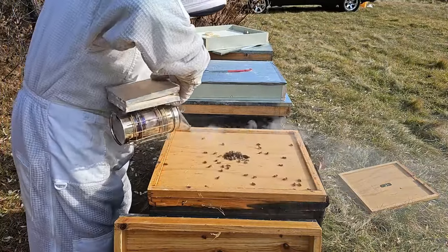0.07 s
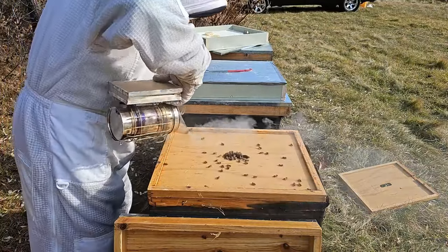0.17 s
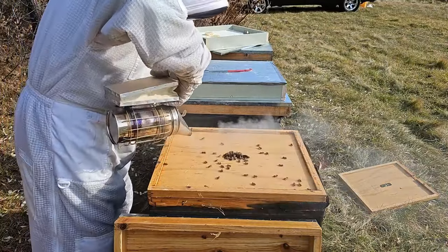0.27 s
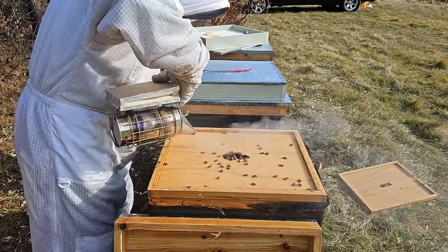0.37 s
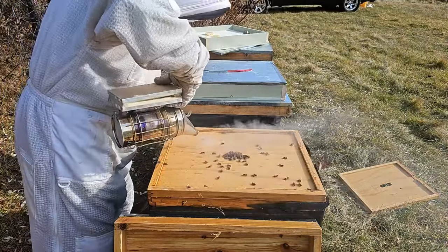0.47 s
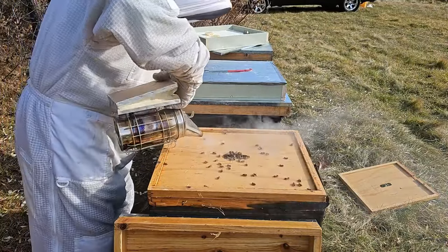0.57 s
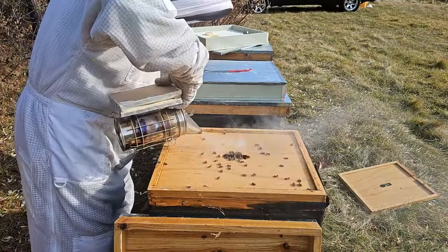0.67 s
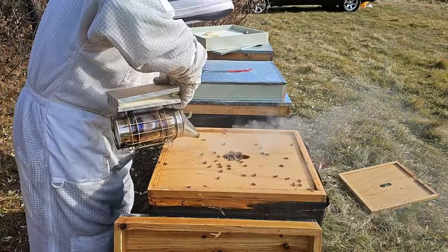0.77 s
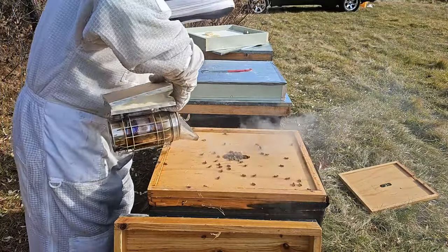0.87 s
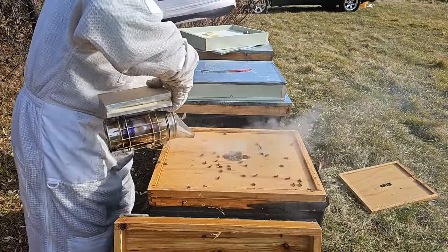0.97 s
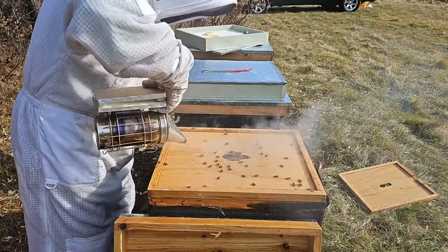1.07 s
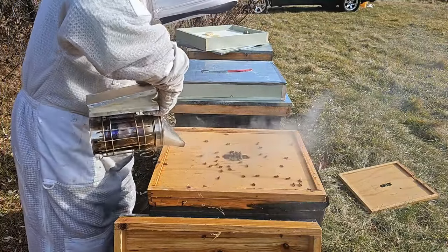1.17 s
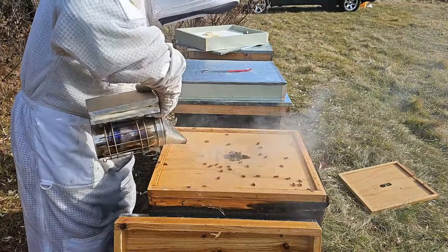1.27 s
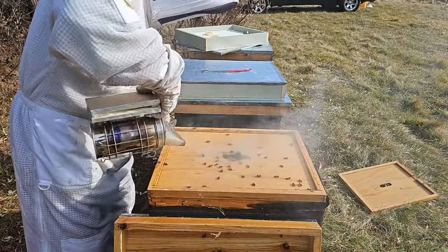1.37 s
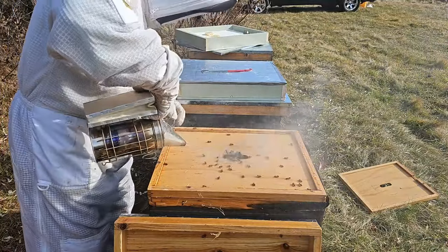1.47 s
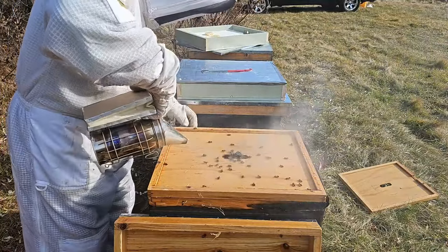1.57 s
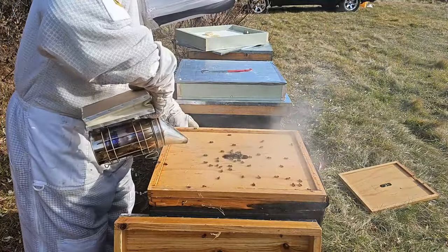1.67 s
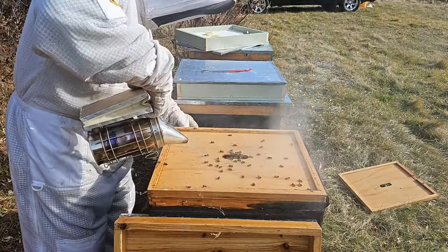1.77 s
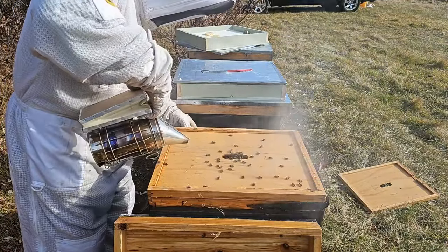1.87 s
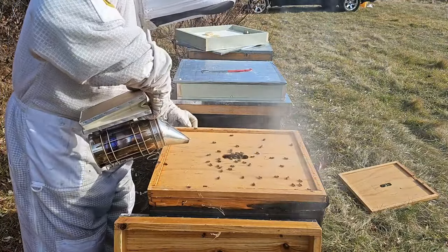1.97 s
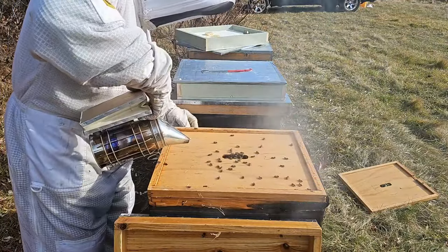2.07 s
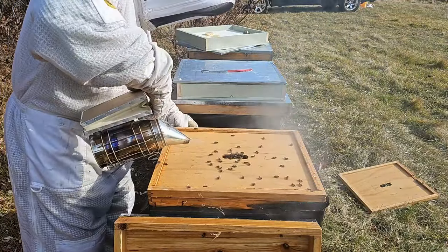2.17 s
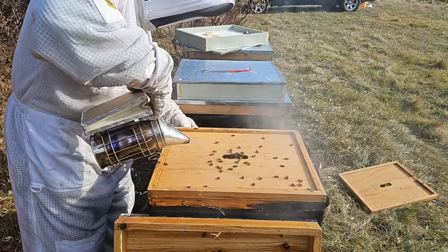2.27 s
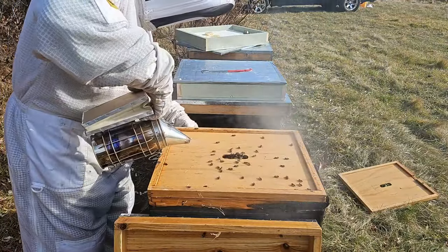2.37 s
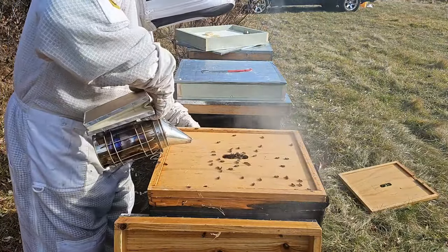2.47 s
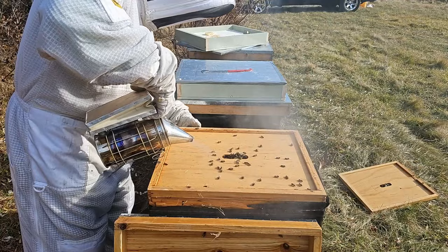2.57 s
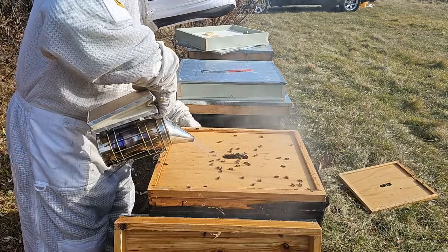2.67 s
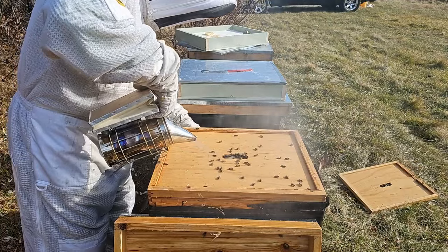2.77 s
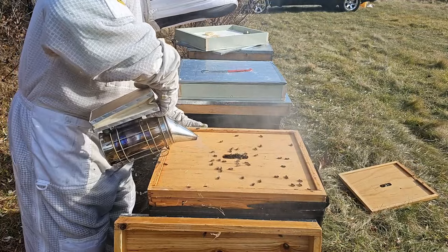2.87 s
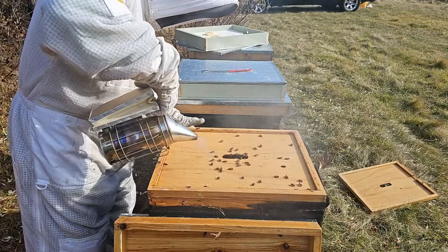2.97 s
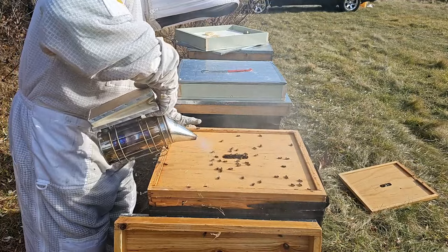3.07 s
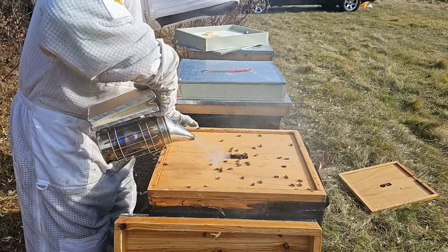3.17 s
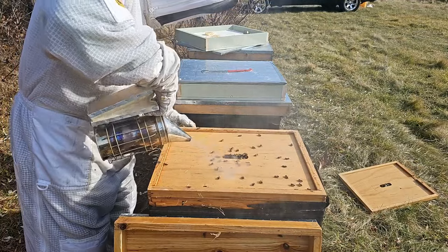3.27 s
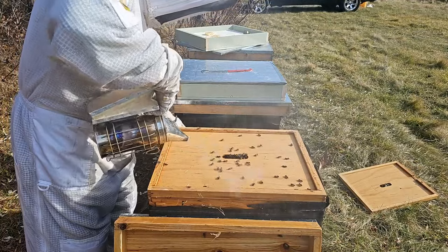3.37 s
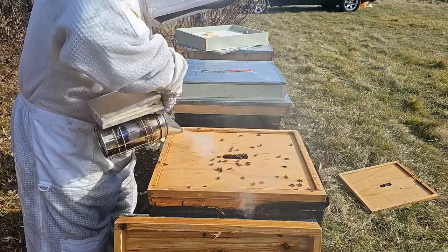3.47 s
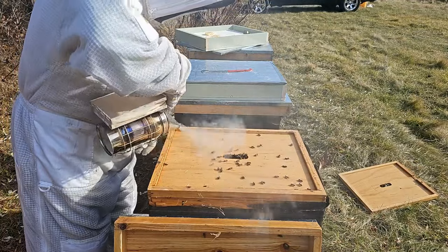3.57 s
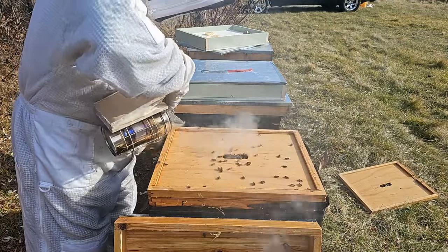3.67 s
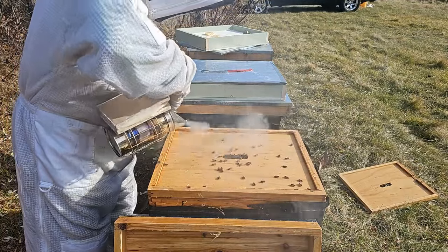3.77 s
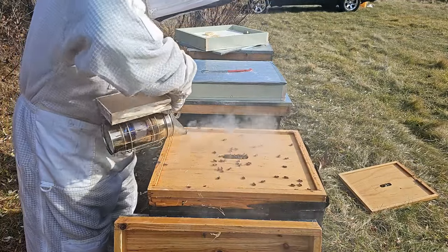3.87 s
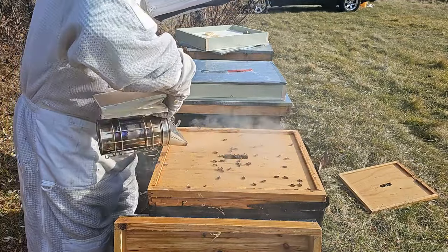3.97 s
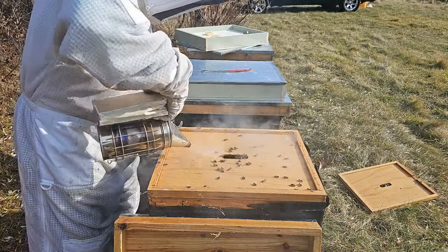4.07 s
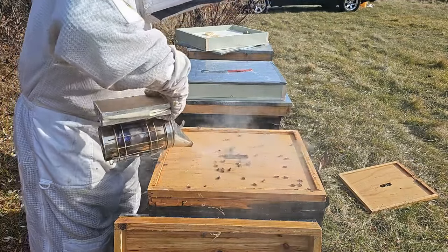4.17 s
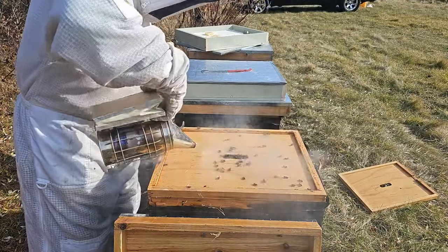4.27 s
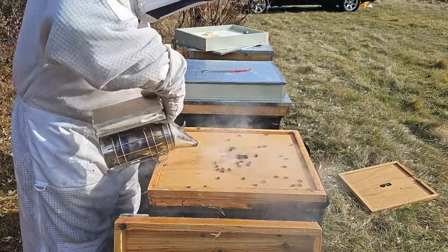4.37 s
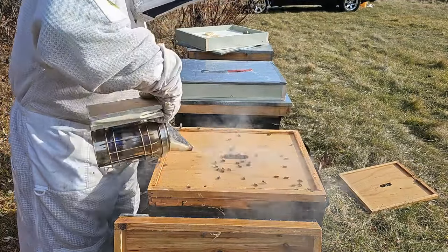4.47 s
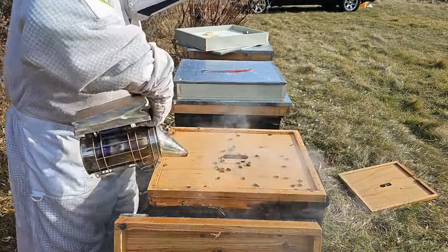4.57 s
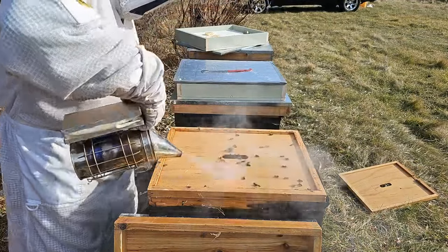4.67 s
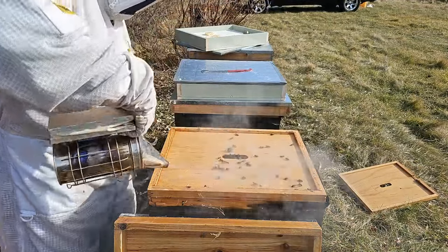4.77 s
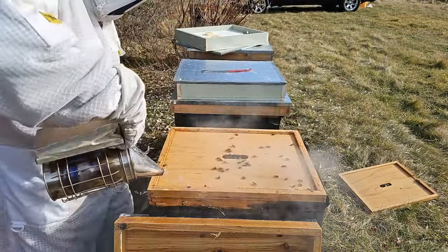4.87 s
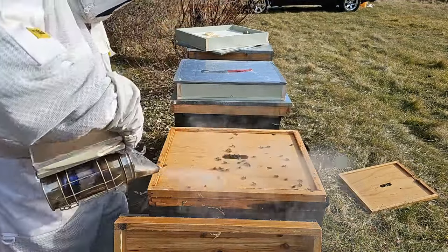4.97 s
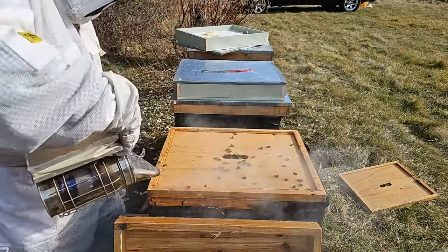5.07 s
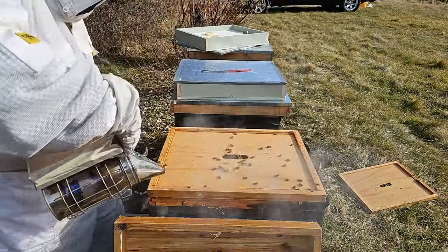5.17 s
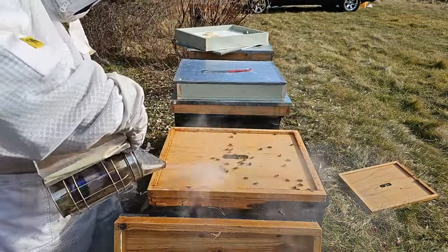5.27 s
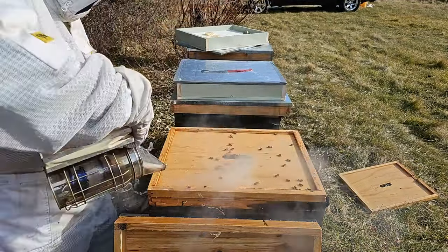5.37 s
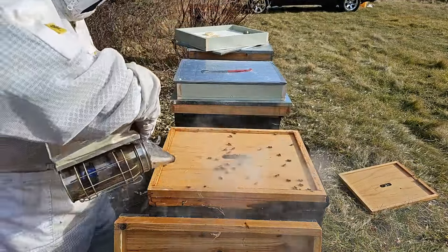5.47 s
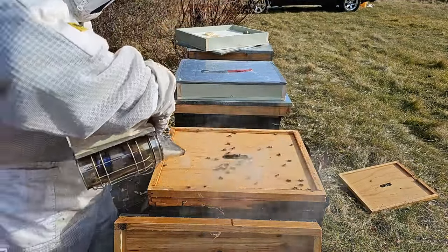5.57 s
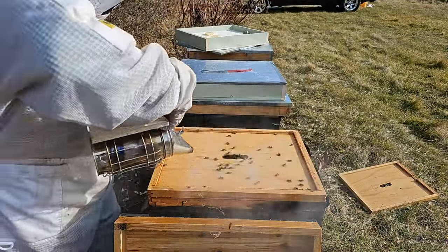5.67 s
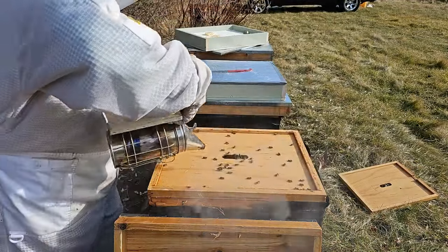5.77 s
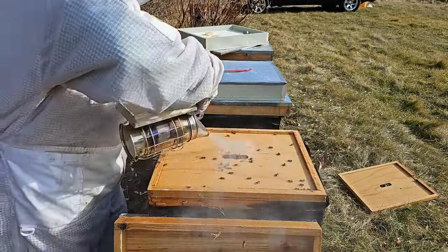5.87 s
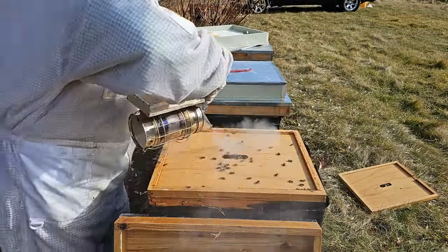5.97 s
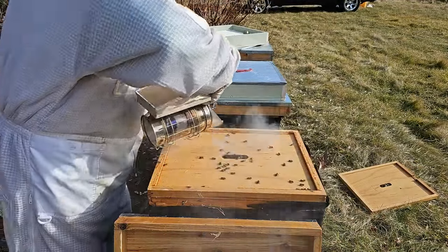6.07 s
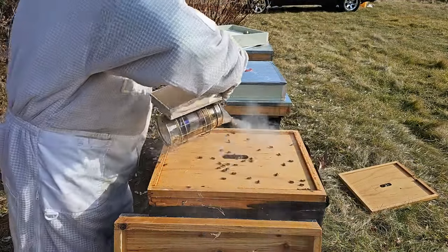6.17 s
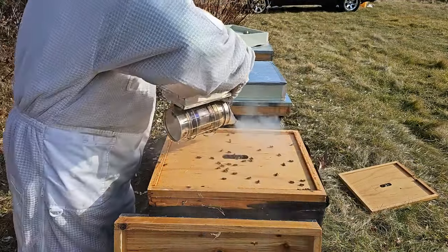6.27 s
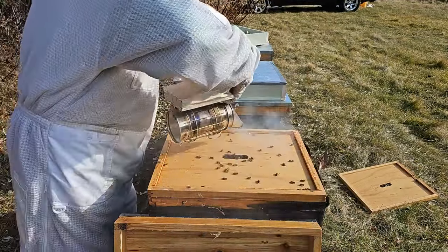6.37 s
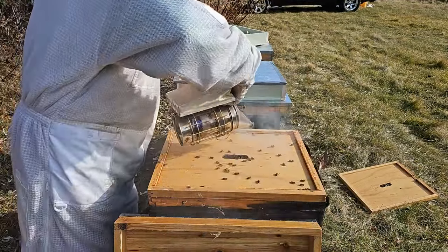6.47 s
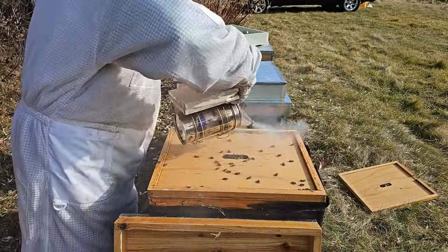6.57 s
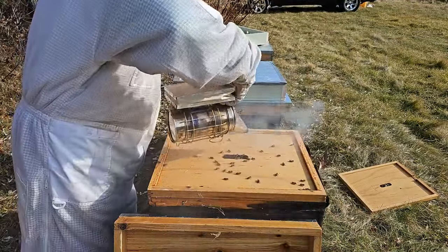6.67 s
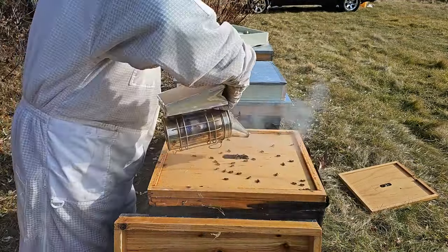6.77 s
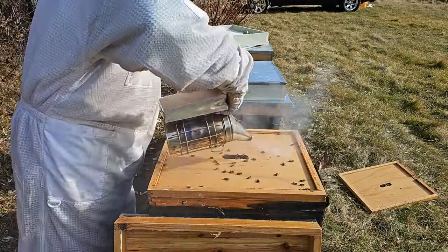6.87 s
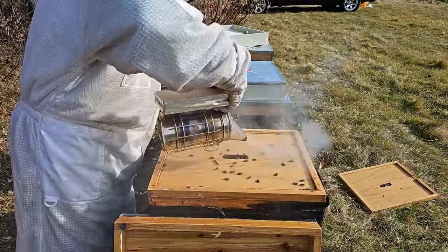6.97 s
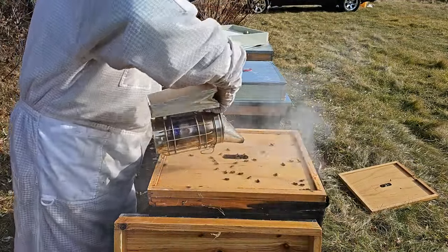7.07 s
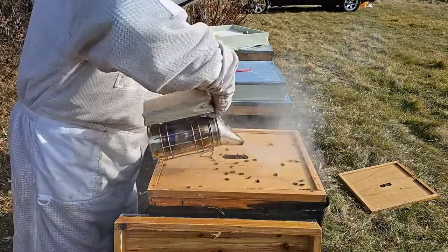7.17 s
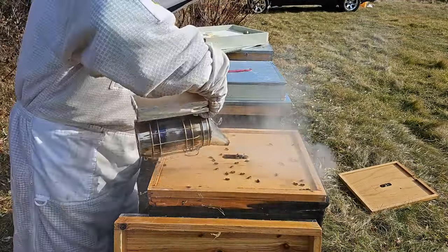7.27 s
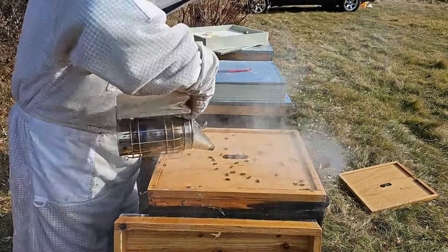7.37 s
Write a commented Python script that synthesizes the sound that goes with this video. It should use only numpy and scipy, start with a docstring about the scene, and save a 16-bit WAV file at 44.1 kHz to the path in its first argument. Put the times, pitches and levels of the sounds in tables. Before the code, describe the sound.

Breathy, rhythmic puffs from a bee smoker's bellows, about three a second, pause for clicks and squeaky rubs, then resume in soft outdoor air.

```python
"""A breathy puff already under way opens the scene: a bee smoker is pumped over an open hive, outdoors.
Six puffs, a pause, then twelve more: turbulent jets are filtered noise, shaped by the flow of each squeeze.
After each, air sucked back in hisses and at times wheezes; folds of the bellows boom as damped sines.
Mostly in the pause, the can clicks (decaying modes) and the glove scrapes and squeaks (grainy noise).
Behind lies soft outdoor air, a slowly swelling noise in which the suit rustles."""
import sys
import numpy as np
from scipy import signal
from scipy.fft import rfft, irfft
from scipy.io import wavfile
from scipy.ndimage import uniform_filter1d, minimum_filter1d

SR = 44100
rng = np.random.default_rng(int(sys.argv[2]) if len(sys.argv) > 2 else 0)


def generate_wav(sig):
    """Save sig (samples, or channels by samples) to the path in sys.argv[1] as 16-bit PCM at SR."""
    pcm = np.round(np.clip(np.atleast_2d(sig).T, -1, 1) * 32767).astype(np.int16)
    wavfile.write(sys.argv[1], SR, pcm)


N = 326869
TIME = np.arange(N) / SR
BLOCK = 2 ** 14   # samples that hold one short event
CUTOFF_HZ = 7300   # top of the final band; spectral tilts level off here


def amp(db):
    """Decibel law: a level becomes an amplitude ratio."""
    return 10 ** (np.asarray(db) / 20)


def rms_one(x):
    """Normalisation: the signal is scaled to an rms of 1."""
    return x / np.sqrt(np.mean(x ** 2) + 1e-20)


def add(out, start, sound):
    """Superposition: a sound is mixed in from a given time on; what falls outside is lost."""
    at = int(round(start * SR))
    first, last = max(at, 0), min(at + len(sound), N)
    if first < last:
        out[first:last] += sound[first - at:last - at]


def noise(spectrum, peaks=(), tilt_db=0, size=N):
    """Spectral shaping: white noise gains a spectrum, bell-shaped peaks or hollows and a tilt per octave; rms 1."""
    octave = np.log2(np.maximum(np.fft.rfftfreq(size, 1 / SR), 1))
    hz, level = np.transpose(spectrum)
    colour = np.interp(octave, np.log2(hz), level)
    colour = colour + tilt_db * np.minimum(octave, np.log2(CUTOFF_HZ))
    for centre, width, gain in peaks:
        colour = colour + gain * np.exp(-.5 * ((octave - np.log2(centre)) / width) ** 2)
    white = rng.standard_normal(size)
    return rms_one(irfft(rfft(white) * amp(colour), size))


def flutter(rate, depth_db, size=N):
    """Random amplitude modulation: a gain of rms 1 wanders about `rate` times a second."""
    steps = np.arange(size) * rate / SR
    knots = rng.standard_normal(size // 10)
    return rms_one(amp(depth_db * np.interp(steps, np.arange(len(knots)), knots)))


def swell(x):
    """Logistic onset: a smooth step from 0 to 1."""
    return 1 / (1 + np.exp(-np.clip(x, -20, 20)))


def struck(modes, t):
    """Modal decay: damped sines, each with a strength of its own at every blow."""
    ring = np.zeros(len(t))
    for k, (hz, db, t60) in enumerate(modes):
        strength = (-1) ** k * amp(db + rng.normal(0, 0.5))
        ring += strength * np.sin(2 * np.pi * hz * t) * np.exp(-np.log(1000) * t / t60)
    return ring


# squeezes of the bellows: start t/s, end t/s, jet relative level/dB, nozzle resonance f/Hz,
# its overtone level/dB, refill relative level/dB, refill fade/(dB/s)
SQUEEZES = [(-0.06, 0.054, -18, 1200, -6, -18, 130), (0.276, 0.381, -17, 1330, 0.5, -28, 164),
            (0.577, 0.667, -19, 1410, 2, -36, 111), (0.852, 0.942, -16, 1370, -4, -21.5, 172),
            (1.147, 1.252, -17, 1330, -5, -21.5, 158), (1.457, 1.56, -18, 1330, 0.5, -28.5, 169),
            (3.632, 3.782, -16, 1240, 0.5, -39, 53), (3.968, 4.084, -15, 1270, -4, -31.5, 60),
            (4.27, 4.386, -17.5, 1330, -0.5, -22, 113), (4.567, 4.668, -17, 1295, -6, -25, 104),
            (4.847, 4.949, -19, 1290, -3.5, -18, 67), (5.132, 5.226, -16.5, 1470, 5, -21.5, 142),
            (5.44, 5.552, -15.5, 1305, 0, -25, 116), (6.021, 6.153, -13, 1170, -9, -24.5, 117),
            (6.382, 6.496, -13, 1124, -4.5, -21, 212), (6.726, 6.839, -16.5, 1110, -3, -26, 190),
            (7.07, 7.182, -17, 1190, -3.5, -15.5, 226.5), (7.386, 7.496, -17.3, 1200, -1, -25, 150)]
# as the smoker is turned, the echo off the hive lid hollows another pitch, and hiss and rush are more or
# less shielded: t/s, hollow f/Hz, hollow level/dB, hiss relative level/dB, rush level/dB
AIM = [(0, 955, -5, -0.5, -16), (0.6, 810, -10.5, -2, -16), (1.099, 855, -6.5, -1, -17),
       (3.8, 756, -4, 1.2, -16), (4.5, 850, -10, 0.5, -16.5), (5.199, 680, -3.5, 2.2, -17),
       (6.2, 657, -6.5, 1.3, -18.5), (6.7, 710, 0, 2.5, -15), (7.3, 710, -7.5, 4, -16.5)]
# spectra of low rush, jet and high hiss: f/Hz, relative level/dB
RUSH_SPECTRUM = [(30, -37.5), (80, -55), (110, -14), (165, 4.5), (270, 4.5), (400, -2), (600, -6.5),
                 (900, -11), (1500, -16.5), (4000, -59.5)]
JET_SPECTRUM = [(40, -68.5), (200, -28.5), (600, -5), (900, -3.5), (1300, 0), (1900, -3.5), (2500, -14),
                (3300, -21), (4500, -34), (7000, -54.5)]
HISS_SPECTRUM = [(100, -66), (1000, -14.5), (2000, 10), (2800, 6), (3700, -1), (4200, -7.5), (4550, -21.5),
                 (5100, -8), (6600, -11), (7500, -38)]
NOZZLE_PEAK_DB, NOZZLE_OVERTONE = 5.5, 1.48   # resonance height; overtone as a multiple of its pitch
ATTACK_S, RELEASE_S = 0.0064, 0.0099   # time scales of the airflow in a squeeze


def puffs():
    """Turbulent jet noise: airflow rises and falls with each squeeze; the higher a sound, the more flow it needs."""
    out = np.zeros(N)
    lead = .1   # s kept before the squeeze
    t = TIME[:BLOCK] - lead
    aim_s, *aim = np.transpose(AIM)
    for start, end, jet_db, nozzle_hz, overtone_db, _, _ in SQUEEZES:
        hollow_hz, hollow_db, hiss_db, rush_db = (np.interp(start, aim_s, column) for column in aim)
        stroke = np.clip(t / (end - start), 0, 1)
        push = amp(2.0 * (np.sin(np.pi * stroke) - 1))   # the hand presses hardest in mid-stroke
        unsteady = flutter(rate=57.3, depth_db=0.74, size=BLOCK)
        flow = push * unsteady * swell(t / ATTACK_S) * swell((end - start - t) / RELEASE_S)

        hollow = (hollow_hz, .2, hollow_db)
        nozzle = (nozzle_hz, .16, NOZZLE_PEAK_DB)
        overtone = (NOZZLE_OVERTONE * nozzle_hz, .12, overtone_db)
        # reflections off the hive colour each puff differently
        ripple = [(hz * amp(rng.normal(0, 0.49)), .04, rng.normal(0, 2.1))
                  for hz in np.geomspace(450, 6500, num=20)]

        rush_noise = noise(RUSH_SPECTRUM, [hollow], size=BLOCK)
        jet_noise = noise(JET_SPECTRUM, [hollow, nozzle, overtone] + ripple, size=BLOCK)
        hiss_noise = noise(HISS_SPECTRUM, [overtone] + ripple, tilt_db=0.6 * hiss_db, size=BLOCK)
        rush = amp(rush_db) * flow ** 0.85 * rush_noise
        jet = amp(jet_db + 2.5) * flow ** 2.0 * jet_noise
        hiss = amp(jet_db + hiss_db - 12.0) * flow ** 3.9 * hiss_noise
        eddies = flutter(rate=320, depth_db=1.47, size=BLOCK)
        add(out, start - lead, rush + (jet + hiss) * eddies)
    return out


# spectrum of air drawn through the inlet: f/Hz, relative level/dB
INLET_SPECTRUM = [(60, -40), (140, 12), (280, 13), (520, 1), (720, 4.5), (1300, 5), (1900, -2.5),
                  (3000, -7), (4000, -14.5), (4600, -26), (6300, -14.5), (7500, -46.5)]
# inlet resonances: f/Hz, width/octave, level/dB
INLET_MODES = [(530, 0.09, 11.5), (858, 0.042, 8.5), (1400, 0.22, 3), (1790, 0.033, 6.5), (2630, 0.079, 1)]
REFILL_DELAY_S, REFILL_S = .009, 0.12   # the spring opens the bellows after each squeeze
INLET_WHISTLE_HZ = 1400   # centre of a small random spread
USUAL_FADE = 180   # dB per s; a slower refill means a narrower gap, which sings more sharply
USUAL_REFILL_DB, REFILL_THINNING = -26.5, .25   # tilt in dB per octave for each dB below the usual level


def refills():
    """Resonant suction noise: the spring opens the bellows and draws air in, fading until they are full."""
    out = np.zeros(N)
    t = TIME[:BLOCK]
    for _, end, *_, level_db, fade in SQUEEZES:
        singing = (USUAL_FADE / fade) ** .4
        modes = [(hz * amp(rng.normal(0, 0.11)), width, db * singing) for hz, width, db in INLET_MODES]
        whistle = (INLET_WHISTLE_HZ * amp(rng.normal(0, 1.2)), .08, 4.0)
        thinning = REFILL_THINNING * (USUAL_REFILL_DB - level_db)   # gentler refills are thinner
        draw = noise(INLET_SPECTRUM, modes + [whistle], tilt_db=thinning, size=BLOCK)
        shape = swell((t - .008) / 0.01) * swell((REFILL_S - t) / 0.059) * amp(-fade * t)
        unsteady = flutter(rate=230, depth_db=2.0, size=BLOCK)
        add(out, end + REFILL_DELAY_S, amp(level_db - 5.0) * shape * draw * unsteady)
    return out


# wheezes of the inlet on slow refills: middle t/s, half length t/s, level/dB, pitch at the middle f/Hz
WHEEZES = [(0.125, 0.067, -43.5, 2066), (3.876, 0.1, -44, 1610), (4.161, 0.046, -41.5, 1464),
           (4.448, 0.042, -46.5, 1272), (4.724, 0.054, -51.5, 1390), (5.017, 0.063, -43, 1418),
           (5.289, 0.055, -50.5, 1810)]
# bands of a wheeze: multiple of the pitch, width as a share of the pitch, relative level/dB
WHEEZE_BANDS = [(.61, 0.038, -8), (1, 0.14, 3), (1.26, 0.087, -3), (1.95, 0.23, -9.5)]
WHEEZE_GLIDE = -0.194   # octaves per s


def wheezes():
    """Narrow-band noise on gliding carriers: air in a narrow gap sings, sliding down as the gap changes."""
    out = np.zeros(N)
    t = TIME[:BLOCK] - TIME[BLOCK // 2]
    for middle, half, level_db, hz in WHEEZES:
        phase = 2 * np.pi * np.cumsum(hz * 2 ** (WHEEZE_GLIDE * t)) / SR
        shape = np.exp(-.5 * np.abs(t / half) ** 2.8)
        for multiple, width, db in WHEEZE_BANDS:
            lowpass = signal.butter(2, width * hz / 2, fs=SR, output="sos")
            a, b = signal.sosfilt(lowpass, rng.standard_normal((2, BLOCK)))
            band = rms_one(a * np.cos(multiple * phase) + b * np.sin(multiple * phase))
            add(out, middle + t[0], amp(level_db + db) * shape * band)
    return out


# hard slaps of a fold: t/s, relative peak level/dB, pitch f/Hz
HARD_FLAPS = [(0.665, -8.5, 179), (0.98, -18, 182), (1.555, -13.5, 176), (2.733, -27.5, 132),
              (3.314, -13.5, 194), (6.504, -17, 177)]
# typical flip before each jet and rebound after it: nominal lead or delay, relative peak, pitch
FOLD_LEAD_S, FOLD_DB, FOLD_HZ = 0.0215, -21, 190
REBOUND_DELAY_S, REBOUND_DB, REBOUND_HZ = 0.028, -25.5, 248


def flaps():
    """Cavity resonance: a fold snaps over around each squeeze, and the bellows air booms for a few cycles."""
    out = np.zeros(N)
    t = TIME[:SR // 8] - TIME[SR // 20]
    folds = []
    for start, end, *_ in SQUEEZES:
        for at, db, hz in [(start - FOLD_LEAD_S, FOLD_DB, FOLD_HZ),
                           (end + REBOUND_DELAY_S, REBOUND_DB, REBOUND_HZ)]:
            folds.append((at, db + rng.normal(0, 1.4), hz * amp(rng.normal(0, 1.5))))
    for start, peak_db, hz in HARD_FLAPS + folds:
        tone = np.sin(2 * np.pi * hz * t + rng.uniform(0, 2 * np.pi))
        boom = swell(t / .0028) * np.exp(-t / 0.0082) * tone
        add(out, start + .005 + t[0], amp(peak_db + 1.0) * boom)   # the rise centres 5 ms after the listed time
    return out


# knocks on the can: t/s, relative peak level/dB, dull thud re the ring level/dB
KNOCKS = [(0.078, -13.5, 0), (1.844, -37, 3), (2.051, -28, -15), (2.325, -37.5, 7), (2.645, -10, -32),
          (2.724, -24, 5.5), (2.967, -9.5, -39), (3.047, -7.5, 9)]
# modes of the tin can: f/Hz, relative level/dB, decay time t60/s
CAN_MODES = [(1240, 1.5, 0.024), (1480, 3, 0.0051), (1890, 0.5, 0.028), (2230, 1, 0.017), (2560, 1, 0.0098),
             (3030, -6, 0.014), (3810, -11.5, 0.017), (5340, -10.5, 0.0057), (5780, -14.5, 0.0099)]
# modes of the wooden bellows board: f/Hz, relative level/dB, decay time t60/s
BOARD_MODES = [(295, -18, 0.078), (543, -8, 0.037), (925, -17, 0.094)]
# spectrum of friction, also used for the crack of a knock: f/Hz, relative level/dB
FRICTION_SPECTRUM = [(80, -7.5), (300, 2), (900, 0.5), (1800, -2), (2800, -2), (3900, -10), (4600, -16),
                     (7000, -70)]
AFTER_RING_DB, AFTER_RING_T60_S = -26, 0.25   # start level re the can modes; decay time
AFTER_RING_WIDTH, AFTER_RING_PEAK_DB = 0.064, 14.5   # its resonances: octaves, height


def clicks():
    """Impact excitation of modes: hard contacts ring the can and thud in the board; the tin rings on faintly."""
    out = np.zeros(N)
    t = TIME[:SR // 3]
    tin = [(hz, AFTER_RING_WIDTH, AFTER_RING_PEAK_DB) for hz, _, _ in CAN_MODES]
    for start, peak_db, thud_db in KNOCKS:
        crack = amp(-35.5) * noise(FRICTION_SPECTRUM, size=len(t)) * np.exp(-t / 0.00083)
        decay = amp(AFTER_RING_DB - 60 * t / AFTER_RING_T60_S)
        after_ring = decay * noise(FRICTION_SPECTRUM, tin, tilt_db=3.5, size=len(t))
        ring = struck(CAN_MODES, t)
        thud = amp(thud_db) * struck(BOARD_MODES, t)
        add(out, start, amp(peak_db - 7.0) * (ring + thud + crack + after_ring))
    return out


# glove and sleeve rub on the smoker: middle t/s, half length t/s, relative level/dB, squeak f/Hz, squeak level/dB
RUBS = [(1.852, 0.0092, -40, 1850, 15), (2.021, 0.02, -39.5, 1810, 13), (2.056, 0.0091, -30.5, 1460, 4.5),
        (2.615, 0.011, -41.5, 2400, 23), (2.672, 0.031, -37.5, 1320, 21), (2.71, 0.019, -43, 3980, 10),
        (2.763, 0.009, -43, 2360, 27), (2.909, 0.0085, -27, 1256, 38), (2.942, .011, -29.5, 1296, 41),
        (2.976, 0.0065, -21, 1380, 3.5), (2.986, .015, -24.5, 2320, 9), (3.049, 0.0039, -18.5, 610, 19),
        (3.078, 0.023, -30, 607, 28), (3.116, 0.016, -41, 1860, 25), (5.669, .013, -38, 1700, 18)]
# resonances of the can that colour every rub: f/Hz, width/octave, level/dB
RUB_MODES = [(314, 0.1, 17), (935, 0.026, 12), (1240, 0.13, 12), (1500, 0.064, 10.5), (1860, 0.049, 9.5),
             (2750, 0.065, 4.5), (4000, 0.036, 6), (6430, 0.068, 16.5)]
# spectrum of the bright edge of a rub: f/Hz, relative level/dB
EDGE_SPECTRUM = [(2500, -16), (3900, -36), (4600, -3), (5400, 4), (6500, -2), (7500, -19.5)]
EDGE_DB, EDGE_LOSS = -10, 0.83   # edge level without squeak; dB lost per dB of squeak


def rubs():
    """Stick-slip friction: grainy noise in the can; the more one resonance squeaks, the less bright edge is left."""
    out = np.zeros(N)
    t = TIME[:BLOCK] - TIME[BLOCK // 2]
    for middle, half, level_db, squeak_hz, squeak_db in RUBS:
        squeak = (squeak_hz, .08, squeak_db)
        friction = noise(FRICTION_SPECTRUM, RUB_MODES + [squeak], size=BLOCK)
        edge = amp(EDGE_DB - EDGE_LOSS * squeak_db) * noise(EDGE_SPECTRUM, RUB_MODES, size=BLOCK)
        grain = flutter(rate=370, depth_db=4.5, size=BLOCK)
        add(out, middle + t[0], amp(level_db) * (friction + edge) * grain / np.cosh(t / half))
    return out


def surroundings(x):
    """Diffuse scattering: convolution with a short decaying noise tail, as from the hives and hedge."""
    t = TIME[:SR // 2]
    tail = noise(INLET_SPECTRUM, size=len(t)) * np.exp(-t / 0.012) * swell((t - .012) / 0.004)
    unit_energy = tail / np.sqrt(np.sum(tail ** 2))
    return signal.fftconvolve(x, unit_energy)[:N]


# spectrum of outdoor air: f/Hz, relative level/dB
AIR_SPECTRUM = [(18, -78.5), (30, -57.5), (75, -35.5), (113, -6), (129, 2), (152, -3.5), (361, -9.5),
                (569, -11.5), (683, -13), (1100, -13.5), (1290, -18), (1820, -20.5), (2570, -32),
                (3080, -32), (7000, -44), (9100, -86), (15400, -120)]
AIR_DB = -46   # level away from the rustle
# the suit rustles as the arm swings round: middle, half length, rise over the air
RUSTLE_S, RUSTLE_HALF_S, RUSTLE_DB = 3.48, 0.43, 8


def background():
    """Broadband ambient noise: soft outdoor air, louder while the suit moves."""
    level_db = AIR_DB + RUSTLE_DB * np.exp(-.5 * ((TIME - RUSTLE_S) / RUSTLE_HALF_S) ** 2)
    return amp(level_db) * noise(AIR_SPECTRUM) * flutter(rate=45, depth_db=1.5)


def scene():
    """Superposition of the smoker close by, a little scatter and the open air; one channel."""
    smoker = puffs() + refills() + wheezes() + flaps() + clicks() + rubs()
    return (smoker + amp(-39) * surroundings(smoker) + background())[None]


CEILING = .49   # limiter threshold, as amplitude before the filters
BASS_CUT_HZ = 79


def record(dry):
    """Peak limiting and band limiting: a fast limiter holds peaks down; deep bass and top are filtered off."""
    window = SR // 300   # samples over which the gain is held and smoothed
    needed = np.minimum(1, CEILING / (np.abs(dry) + 1e-9))
    gain = uniform_filter1d(minimum_filter1d(needed, window), window)
    bass_cut = signal.butter(4, BASS_CUT_HZ, "high", fs=SR, output="sos")
    top_cut = signal.ellip(10, .2, 80, CUTOFF_HZ, fs=SR, output="sos")
    return signal.sosfilt(top_cut, signal.sosfilt(bass_cut, dry * gain))


dry = scene()
out = record(dry)
generate_wav(out)
```